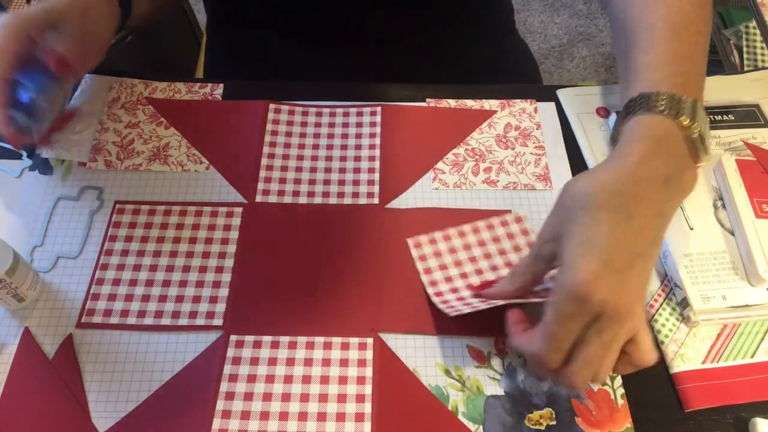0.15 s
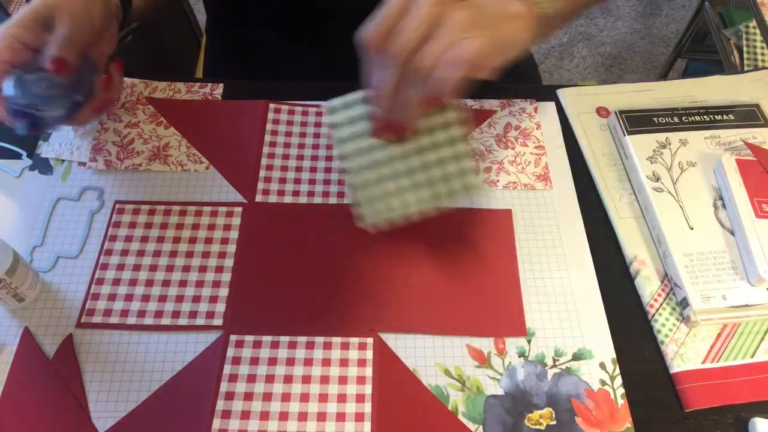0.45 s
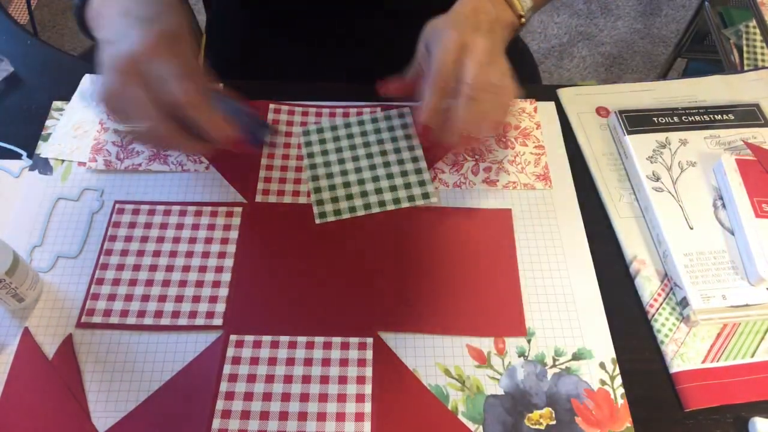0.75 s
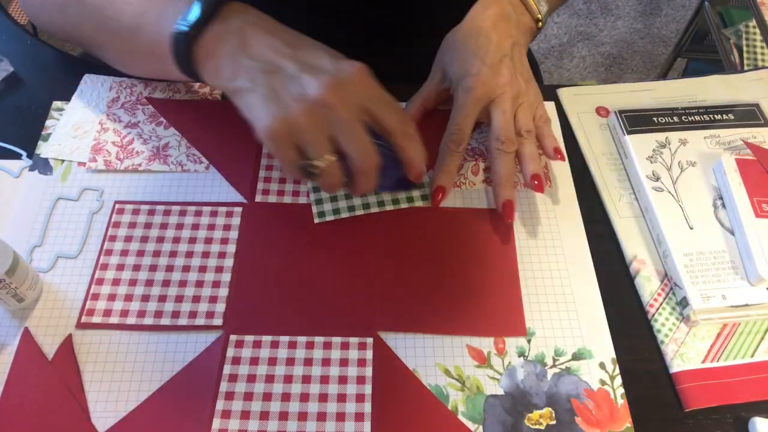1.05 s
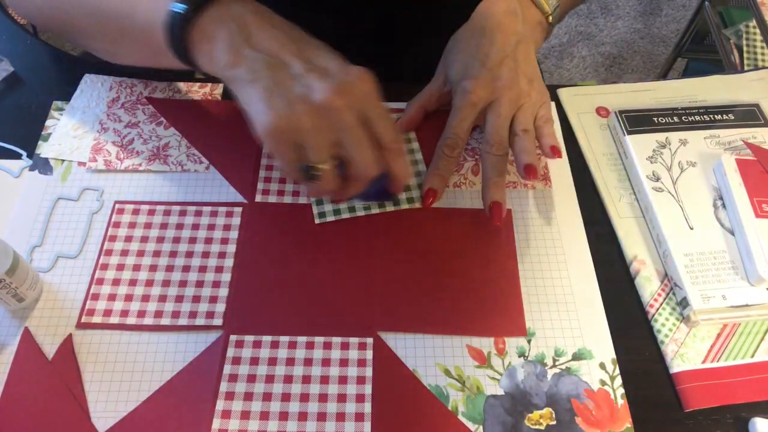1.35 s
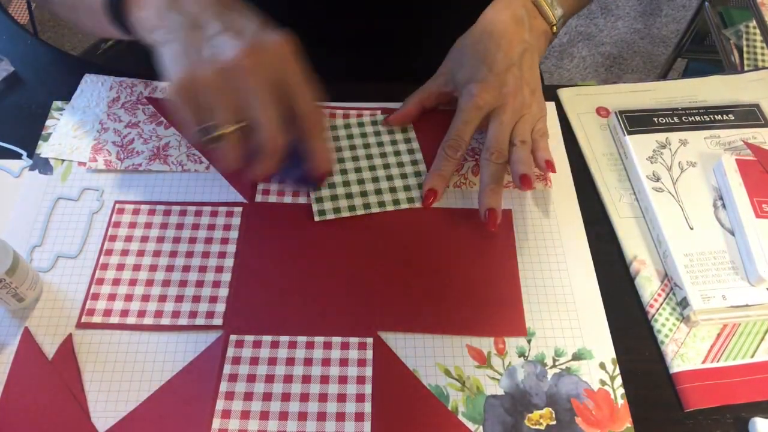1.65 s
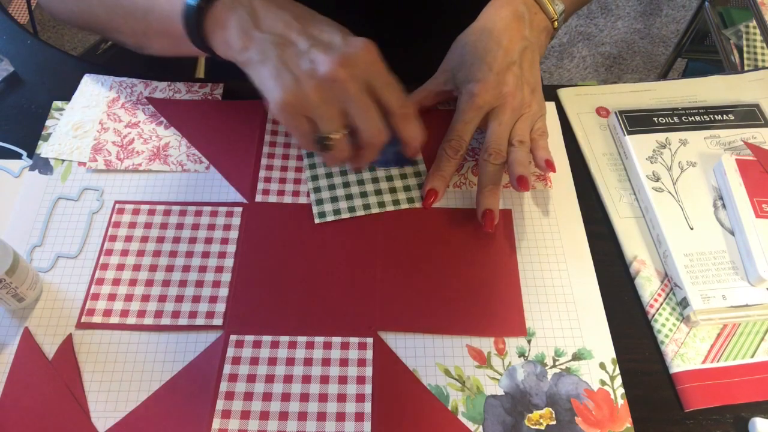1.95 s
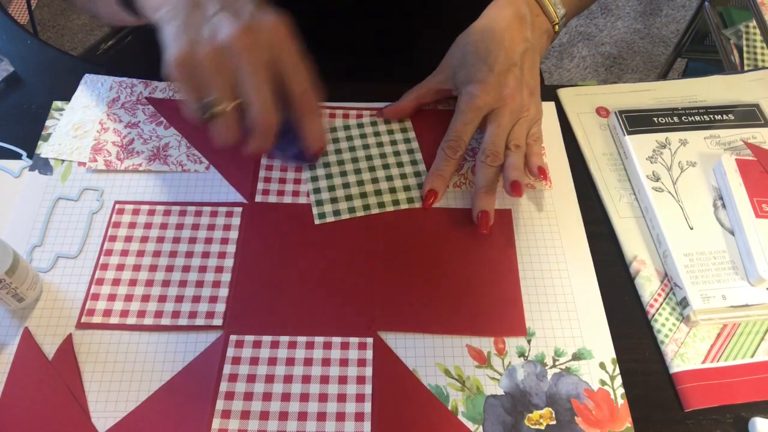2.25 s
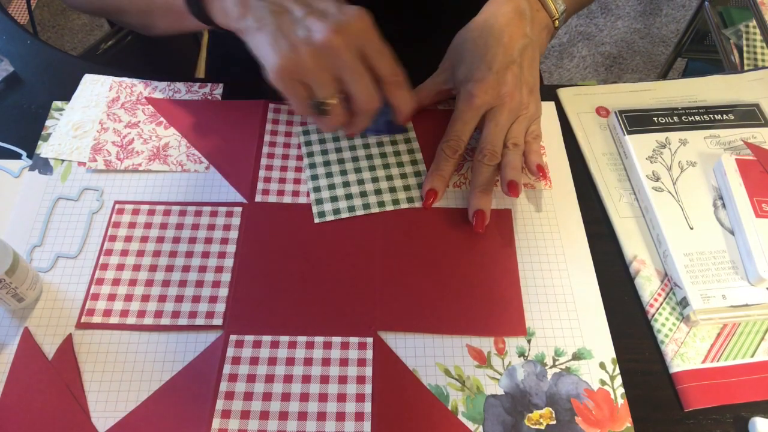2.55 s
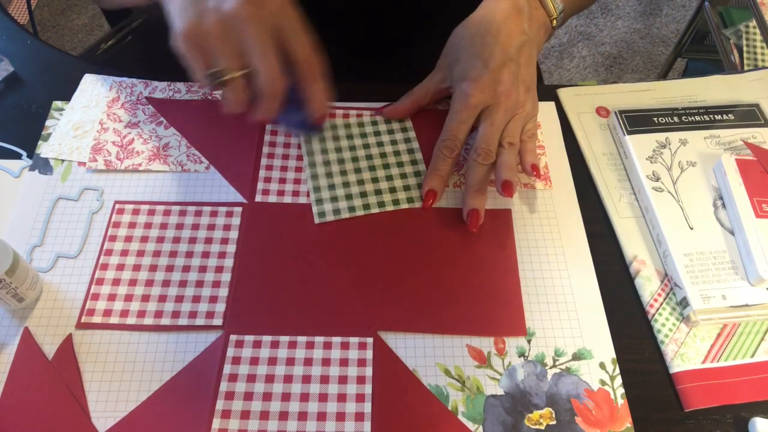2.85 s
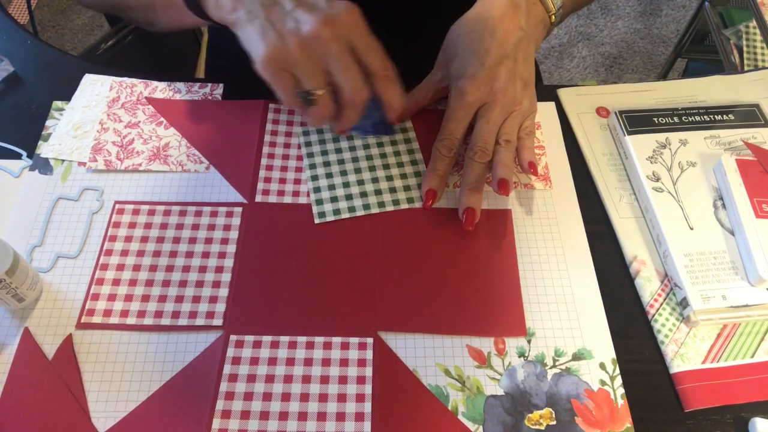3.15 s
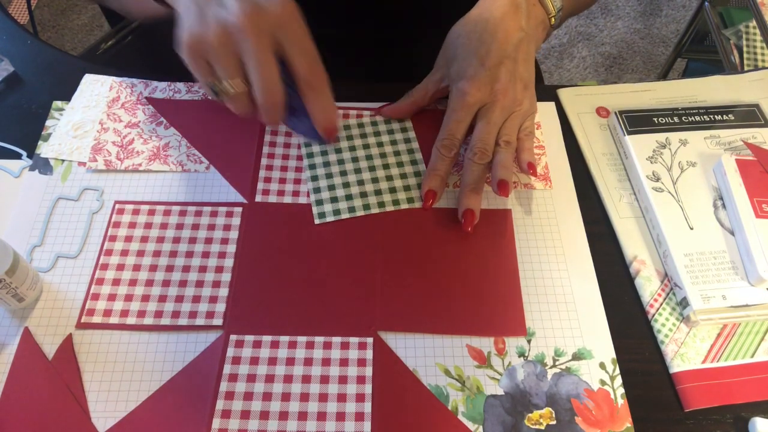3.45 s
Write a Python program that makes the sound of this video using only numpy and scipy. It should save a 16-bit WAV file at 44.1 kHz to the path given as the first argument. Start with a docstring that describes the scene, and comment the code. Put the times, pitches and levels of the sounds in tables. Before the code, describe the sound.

An adhesive tape runner makes four brief, fast ratcheting zips on paper, each after a small tap on the table. Paper swishes and snaps come first; close microphone in a small, quiet room.

```python
"""A plastic tape runner is set down on a paper square and drawn across it four times on a craft table, heard close.
Each ratchet tooth is a noise burst with some clean ringing, faster as the hand speeds up; tape peels off as hiss.
Before that the square is slid over and turned: grainy bands of noise, with short resonant snaps and creaks.
Landings add a noisy scuff and a thump of decaying sines; a small room answers over room tone and a low hum."""
import sys
import numpy as np
from scipy import signal
from scipy.fft import rfft, irfft, next_fast_len
from scipy.io import wavfile
from scipy.ndimage import uniform_filter1d

SR = 44100
rng = np.random.default_rng(int(sys.argv[2]) if len(sys.argv) > 2 else 0)


def wav_record(signal):
    """Record a signal, one row per channel, as 16-bit PCM in the file named by sys.argv[1]."""
    frames = np.transpose(np.atleast_2d(signal))
    bounded = np.clip(frames, -1, 1)
    # unit amplitude maps onto the largest positive 16-bit level
    quanta = np.round(bounded * 32767).astype(np.int16)
    wavfile.write(sys.argv[1], SR, quanta)


N = 158760  # samples

RISE_S = .0008  # time constant with which a snap swells


def amp(db):
    """dB to gain."""
    return 10 ** (np.asarray(db) / 20)


def unit(x):
    """Scaled to rms 1."""
    return x / np.sqrt(np.mean(x ** 2) + 1e-20)


def along(points, hz):
    """Values between (Hz, value) points, on a log frequency axis."""
    f, v = np.transpose(points)
    return np.interp(np.log(hz + 1), np.log(f + 1), v)


def filtered(x, response):
    """x passed through a complex response of frequency."""
    m = next_fast_len(x.shape[-1] + 8192)
    spectrum = rfft(x, m) * response(np.fft.rfftfreq(m, 1 / SR))
    return irfft(spectrum, m)[..., :x.shape[-1]]


def colour(spectrum):
    """Frequency response that follows (Hz, dB) points."""
    return lambda hz: amp(along(spectrum, hz))


def peak(hz, wide_hz):
    """Frequency response of one resonance."""
    return lambda f: 1j * f * wide_hz / (hz * hz - f * f + 1j * f * wide_hz)


def twice(response):
    """The response applied twice, for steeper skirts."""
    return lambda f: response(f) ** 2


def level(response):
    """The response scaled to rms gain 1, so that white noise keeps its level."""
    return lambda f: response(f) / np.sqrt(np.mean(np.abs(response(f)) ** 2))


def add(out, s, x):
    """Mix x into out at time s."""
    part = out[round(s * SR):][:len(x)]
    part += x[:len(part)]


def patchy(x, depth_db):
    """Colour that shifts at random from moment to moment."""
    z = signal.stft(x, nperseg=256)[2]
    field = uniform_filter1d(rng.standard_normal(z.shape), size=3, axis=0)  # across frequency
    field = uniform_filter1d(field, size=14, axis=1)  # along time
    return signal.istft(z * amp(depth_db * unit(field)), nperseg=256)[1][:len(x)]


def bursts(times, gains, t60, n, hz=None):
    """Noise bursts that rise fast and die, and a clean ring at the same moments if a pitch is given."""
    t = np.arange(n // 8) / SR
    shape = (1 - np.exp(-t / RISE_S)) * amp(-60 * t / t60)
    hits = np.bincount((times * SR).astype(int), gains, n)[:n]

    def play(hit):
        return signal.fftconvolve(hits, hit / np.linalg.norm(hit))[:n]

    noisy = rng.standard_normal(n) * play(shape)
    return noisy, play(shape * np.sin(2 * np.pi * hz * t)) if hz else None


def struck(times, gains, t60, n, hz, response):
    """Hard plastic struck: resonant noise mixed with a share of clean ringing."""
    clear = .25  # share of the energy that rings clean
    noisy, ring = bursts(times, gains, t60, n, hz)
    return np.sqrt(1 - clear) * filtered(noisy, level(response)) + np.sqrt(clear) * ring


def pawl_snap(times, gains, n):
    """The pawl drops off a tooth: a very high, very short resonance."""
    hz, wide_hz, t60_s = 14300, 2600, .008
    return struck(times, gains, t60_s, n, hz, peak(hz, wide_hz))


def plastic_shell(times, gains, n, hz):
    """The shell rings in a broad resonance at each blow or creak."""
    wide_hz, t60_s = 480, 0.015
    return struck(times, gains, t60_s, n, hz, twice(peak(hz, wide_hz)))


def tape_peel(times, gains, steady_gain, steady_share, n):
    """Tape leaves its backing in jerks at the teeth, over hiss that takes a growing share of the energy."""
    # colour of tape and paper: frequency_hz, relative level_db
    peel_spectrum = [(500, -30.5), (1300, -9), (2600, -10), (3600, -8), (5000, -13), (6700, -10),
                     (7800, -15), (10500, -22.5), (15700, -20)]
    jerks = bursts(times, gains, 0.019, n)[0]  # t60 in s
    steady = steady_gain * rng.standard_normal(n)
    mix = np.sqrt(1 - steady_share) * jerks + np.sqrt(steady_share) * steady
    return filtered(mix, level(colour(peel_spectrum)))


def strokes():
    """Every tooth snaps the pawl, rings the shell and jerks the tape off its backing."""
    # gear turning, one list a stroke: time_s, teeth_passed
    gear_turning = [
        [(1.3668, 0), (1.3829, 1), (1.3959, 2), (1.4062, 3), (1.4621, 11), (1.543, 22), (1.6325, 38)],
        [(2.0407, 0), (2.0502, 1), (2.0659, 3), (2.0831, 6), (2.1673, 20), (2.189, 23), (2.234, 30),
         (2.261, 35)],
        [(2.6378, 0), (2.6501, 1), (2.666, 3), (2.693, 7), (2.7445, 16), (2.7842, 22), (2.8654, 36)],
        [(3.2416, 0), (3.2554, 1), (3.2677, 2), (3.2869, 4), (3.3276, 9), (3.3594, 14), (3.4148, 26)],
    ]
    # weak teeth that slip before the first three strokes: time_s, level_db against a full tooth
    slack_teeth = [
        [(1.337, -19.5), (1.3595, -16)],
        [(2.012, -22), (2.027, -5)],
        [(2.58, -25.5), (2.596, -24), (2.607, -9.5), (2.621, -13)],
        [],
    ]
    # five even steps from first to last tooth of each stroke: snap_db, shell_over_snap_db, peel_over_snap_db
    stroke_levels = [
        [(-35.5, 5.5, 2), (-34, -3, 1.5), (-35.5, 3.5, 3), (-36, 3.5, 3), (-39.5, -2.5, 7.5)],
        [(-35.5, -8, 2.5), (-37.5, 7.5, 7.5), (-37, 8, 4), (-35, -7, 1.5), (-37.5, -7, 8)],
        [(-36.5, 4, 5.5), (-33.5, 6.5, -0.5), (-39, -11, 5.5), (-37, -3, 7), (-40, 6.5, 10)],
        [(-37.5, 5.5, 4), (-37.5, 1, 3), (-37, -2.5, 4), (-36.5, -4, 5), (-37.5, 7.5, 6.5)],
    ]
    # the shell's main ring moves with the grip, one value a stroke: pitch_hz
    shell_pitches = [1770, 1850, 1386, 1420]
    # the shell creaks while the hand presses down, one value a stroke: level_db before a random strength
    creak_levels = [-53.5, -43, -46, -53]
    creaks_per_s, press_s = 250, .062  # press_s: from pressing down to the first full tooth
    scatter_db, jitter_s = 1.5, .0002  # standard deviations from tooth to tooth
    out, n = np.zeros(N), SR
    tables = zip(gear_turning, slack_teeth, stroke_levels, shell_pitches, creak_levels)
    for teeth, slack, rows, shell_hz, creak_db in tables:
        s, count = np.transpose(teeth)
        at = np.interp(np.arange(count[-1] + 1), count, s)
        # every tooth stores the same spring energy; the usual gap turns levels into gains of single hits
        gap = np.sqrt(np.median(np.diff(at)) * SR)
        at = at + jitter_s * rng.standard_normal(len(at)) * (at > at[2])
        early, early_db = np.reshape(slack, (-1, 2)).T
        tooth_db = np.r_[early_db, 0 * at]
        at = np.r_[early, at]
        start = s[0] - press_s
        when = np.linspace(s[0], s[-1], len(rows))
        snap_db, shell_db, peel_db = np.transpose(rows)

        def gains(db):
            scatter = scatter_db * rng.standard_normal(len(at))
            return gap * amp(np.interp(at, when, db) + tooth_db + scatter)

        hits = at - start
        snap = pawl_snap(hits, gains(snap_db), n)
        shell = plastic_shell(hits, gains(snap_db + shell_db), n, shell_hz)
        when_creak, strength = rng.random((2, round(press_s * creaks_per_s)))
        creaks = plastic_shell(press_s * when_creak, gap * amp(creak_db) * strength, n, shell_hz)

        t = start + np.arange(n) / SR
        steady_share = np.interp(t, s[[0, -1]], [0.059, 0.37])
        steady_gain = amp(np.interp(t, when, snap_db + peel_db)) * (t > s[0]) * (t < s[-1])
        peel = tape_peel(hits, gains(snap_db + peel_db), steady_gain, steady_share, n)
        add(out, start, patchy(snap + shell + creaks + peel, depth_db=2.5))
    return out


def landings():
    """Runner meets paper: a scuff of rattling contacts, the shell's ring and a thump in the table."""
    # start_s, level_db, thump_over_level_db, shell_over_scuff_db, hold_s, shell_pitch_hz
    touchdowns = [(1.185, -33, -7.5, 2, 0.0092, 1820), (1.96, -31, -1, 1, 0.021, 1810),
                  (2.5302, -25, -2.5, 2.5, 0.016, 1430), (3.174, -24, -6, 0, 0.0067, 1380)]
    # colour of the scuff: frequency_hz, relative level_db
    scuff_spectrum = [(120, 3.5), (350, 2), (700, -25), (3500, 3), (7000, -8), (15700, -18.5)]
    # modes of the table top: pitch_hz, relative level_db, t60_s
    table_modes = [(138.5, -6, 0.094), (192.6, -8.5, 0.049), (273.6, -0.5, 0.1)]
    scuff_t60_s, rise_s = 0.055, 0.0062
    out, t = np.zeros(N), np.arange(SR // 3) / SR
    rise = np.minimum(t / rise_s, 1) ** 2
    for s, db, thump_db, shell_db, hold_s, hz in touchdowns:
        noise = rng.standard_normal((3, len(t)))
        rattle = amp(4 * unit(uniform_filter1d(noise[2], 90)))
        shape = rise * amp(-60 * np.maximum(t - hold_s, 0) / scuff_t60_s) * rattle

        def scuff_response(f):
            # the low end of the scuff follows the thump
            return colour(scuff_spectrum)(f) * np.where(f < 500, amp(thump_db), 1)

        scuff = unit(filtered(noise[0], scuff_response))
        shell = amp(shell_db) * unit(filtered(noise[1], peak(hz, 210)))
        modes = [amp(mode_db - 60 * t / t60) * np.sin(2 * np.pi * f * t) for f, mode_db, t60 in table_modes]
        thump = amp(thump_db) * sum(modes) * rise
        add(out, s, amp(db) * (amp(-9.5) * shape * (scuff + shell) + thump))
    return out


def ticks():
    """Paper snaps and runner creaks: short noise bursts, each ringing around its own pitch."""
    # start_s, peak level_db, pitch_hz
    snaps = [(0.022, -39.5, 1300), (0.056, -43, 2780), (0.429, -41.5, 2680), (0.456, -34, 2000),
             (0.559, -38, 1290), (0.621, -20, 2980), (0.649, -26, 1740), (0.867, -53, 2950),
             (0.914, -41, 3100), (0.981, -50, 1710), (1.107, -51.5, 1270), (1.299, -34.5, 1650),
             (1.95, -24.5, 4530), (2.986, -19, 5000), (2.995, -28.5, 3180)]
    q, t60_s = 1.11, 0.0099  # q: pitch over width of the resonance
    out, t = np.zeros(N), np.arange(SR // 15) / SR
    shape = amp(-60 * t / t60_s) * (1 - np.exp(-t / RISE_S))
    for s, db, hz in snaps:
        burst = rng.standard_normal(len(t)) * shape
        tone = filtered(burst, twice(peak(hz, hz / q)))
        add(out, s, amp(db) * tone / np.abs(tone).max())
    return out


def noise_bands():
    """Short grainy bands of noise, hiss above and flapping below: paper swishes, a low ring, the runner's release."""
    # paper swishes, a short low ring dying away among them (1100 Hz), and last the runner's release:
    # start_s, end_s, first level_db, last level_db (before grain), pitch_hz
    bands = [(0, 0.145, -59, -54, 3020), (0.225, 0.343, -54.5, -36.5, 2830), (0.355, 0.458, -66, -53, 2830),
             (0.593, 0.612, -41.5, -53, 1100), (0.574, 0.676, -54, -47.5, 3400),
             (2.998, 3.018, -35.5, -42.5, 2470)]
    treble_db, flap_db, flap_hz = -9.5, -21, 294  # levels against the band
    fade_s, broad_hz = 0.034, 2310  # the band widens with pitch: as wide as its centre at broad_hz
    t, out, noise = np.arange(N) / SR, np.zeros(N), rng.standard_normal((4, N))
    grain = unit(amp(3 * unit(uniform_filter1d(noise[2], size=120))))
    treble = unit(filtered(noise[1], lambda f: f > 6000))
    flap = unit(filtered(noise[3], twice(peak(flap_hz, flap_hz))))
    for start, end, first_db, last_db, hz in bands:
        body = unit(filtered(noise[0], twice(peak(hz, hz ** 2 / broad_hz))))
        times = [start - .015, start, end, end + fade_s]
        levels = [first_db - 8, first_db, last_db, last_db - 57]
        db = np.interp(t, times, levels, -np.inf, -np.inf)  # silent outside
        out += amp(db) * (body + amp(treble_db) * treble + amp(flap_db) * flap)
    return patchy(out * grain, depth_db=1.5)


def room(x):
    """Each frequency of the tail dies at its own speed; the tail differs from moment to moment."""
    # decay of the small room: frequency_hz, t60_s
    decay = [(200, 0.32), (2500, 0.24), (14000, 0.19)]
    out, step = np.zeros(N), SR // 10
    for i in range(0, N, step):
        hz, t, z = signal.stft(rng.standard_normal(SR // 2), SR, nperseg=256)
        fall = amp(-60 * t / along(decay, hz)[:, None])
        tail = signal.istft(z * fall, SR, nperseg=256)[1]
        reply = signal.fftconvolve(x[i:i + step], tail / np.linalg.norm(tail))
        add(out, i / SR + 0.0022, reply)  # the tail starts 2.2 ms late
    return out


def air():
    """Coloured noise as room tone, and a low hum whose phase wavers slowly at random."""
    # colour of the room tone: frequency_hz, relative level_db
    tone_spectrum = [(45, -5), (64, -10.5), (120, -6.5), (424, -17.5), (15700, -37.5)]
    tone_db = -64  # rms above 100 Hz
    hum_hz, waver_hz, hum_db = 61.8, 3.3, -58.5  # waver_hz: fastest wandering of the phase
    noise = rng.standard_normal((2, N))
    tone = filtered(noise[0], colour(tone_spectrum))
    tone = tone / np.std(filtered(tone, lambda f: f > 100))
    waver = 0.73 * unit(filtered(noise[1], lambda f: f < waver_hz))  # radians
    hum = np.sin(2 * np.pi * hum_hz * np.arange(N) / SR + waver)
    return amp(tone_db) * tone + amp(hum_db) * hum


def scene():
    """Hands at work close by, the room's answer, the air."""
    room_db = -8.5
    near = strokes() + landings() + ticks() + noise_bands()
    return (near + amp(room_db) * room(near) + air())[None]


def record(dry):
    """Band limits: deep bass falls away, treble fades out just below 16 kHz."""
    top_hz, bass_hz = 16000, 40

    def response(hz):
        treble = np.clip((top_hz - hz) / 300, 0, 1) ** 2
        return treble / (1 + (bass_hz / (hz + 1)) ** 4)

    return filtered(dry, response)


dry = scene()
out = record(dry)
wav_record(out)
```